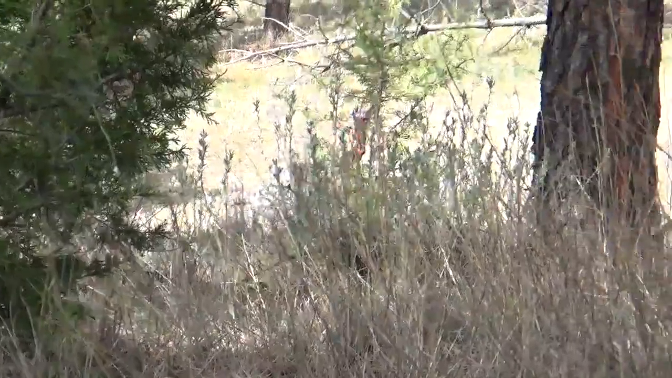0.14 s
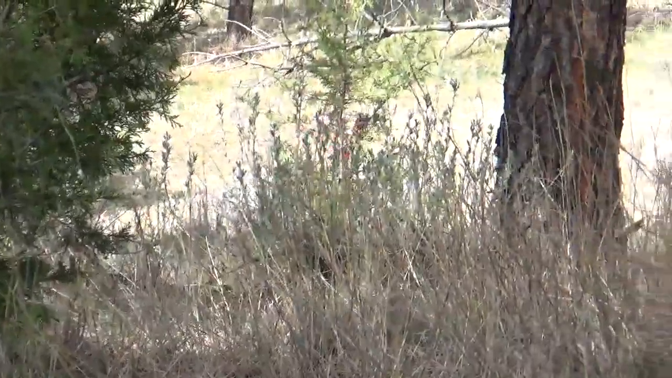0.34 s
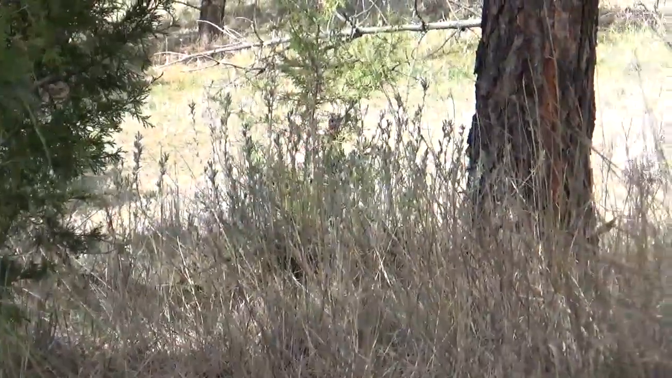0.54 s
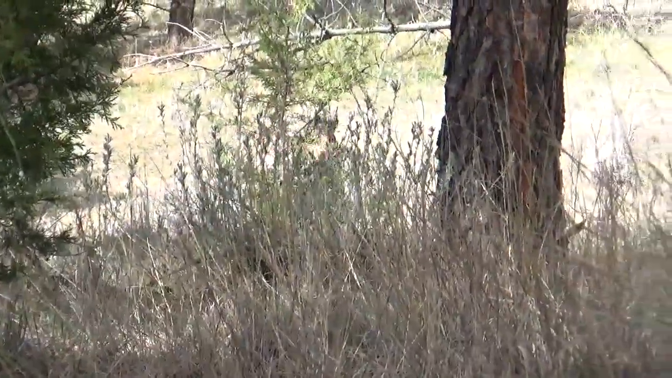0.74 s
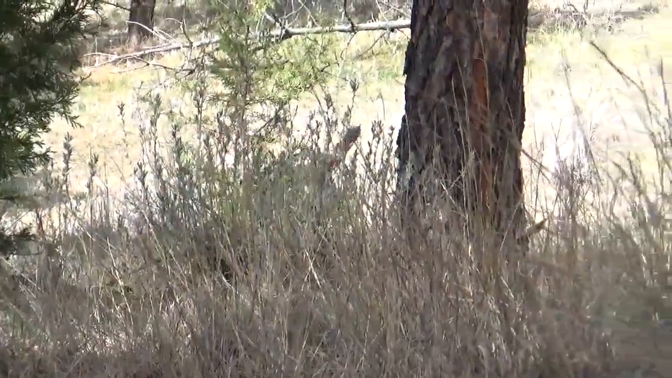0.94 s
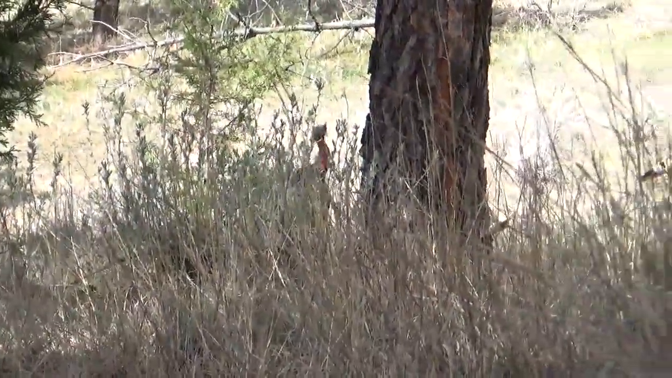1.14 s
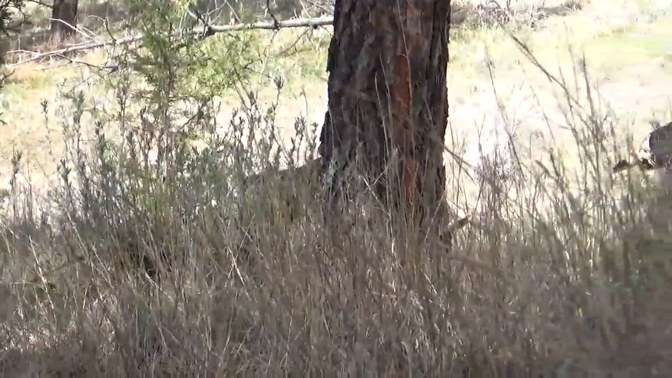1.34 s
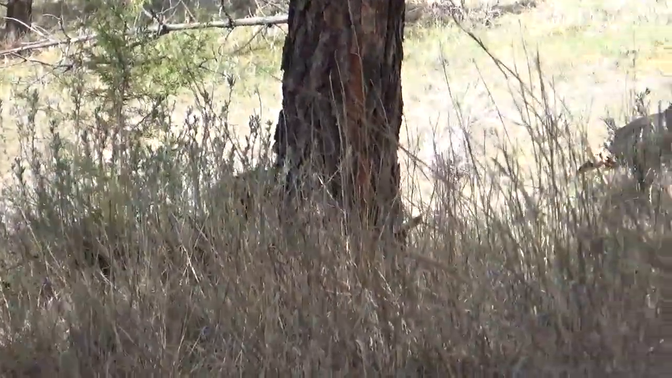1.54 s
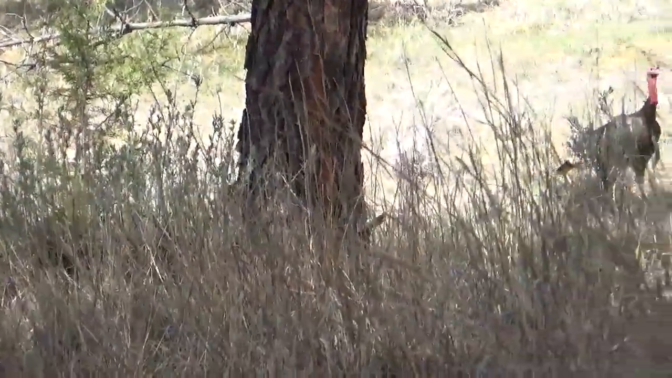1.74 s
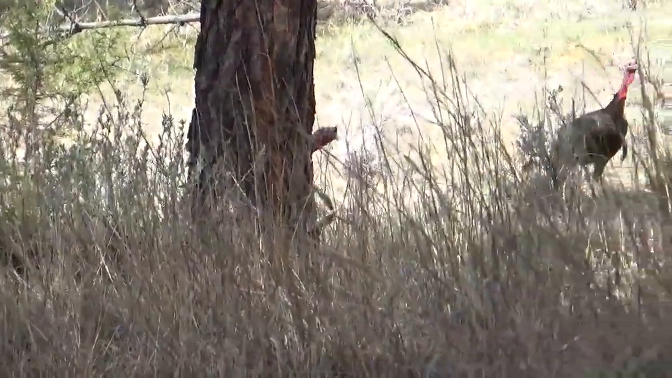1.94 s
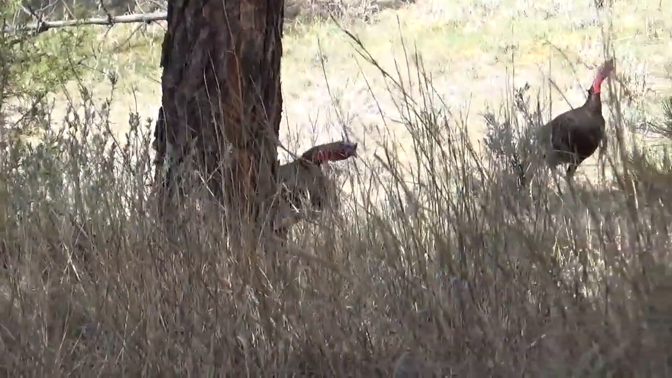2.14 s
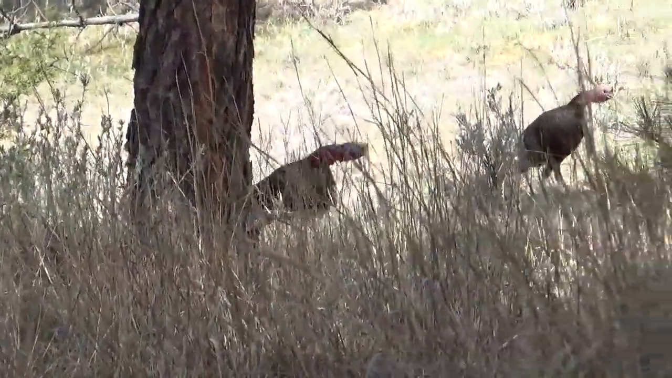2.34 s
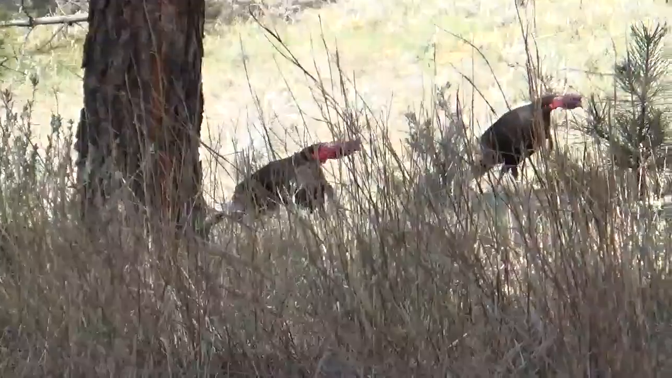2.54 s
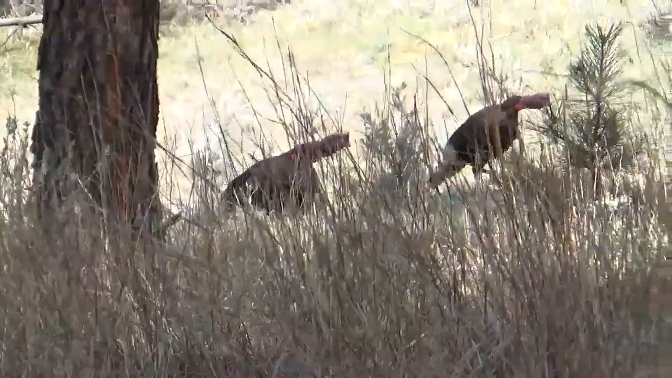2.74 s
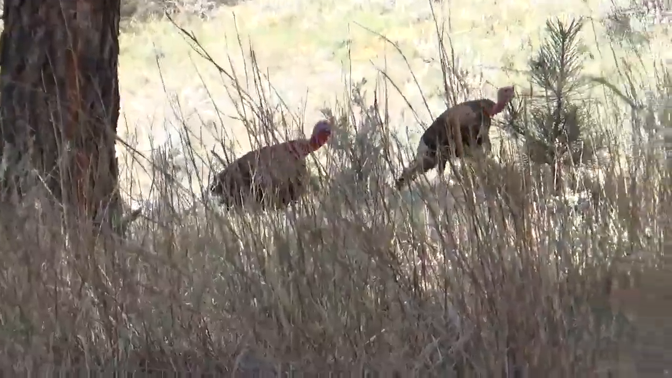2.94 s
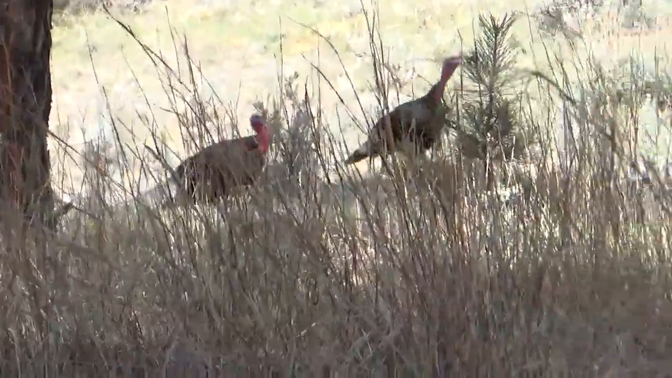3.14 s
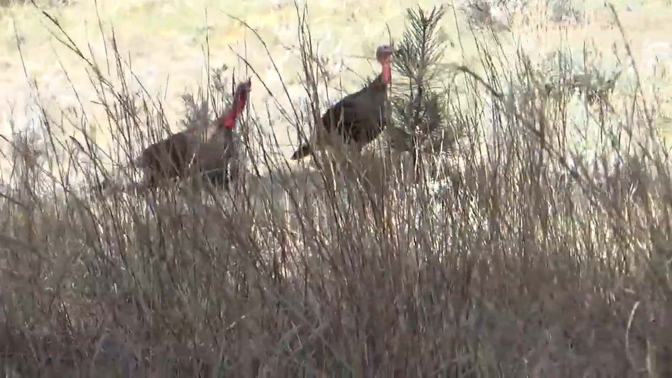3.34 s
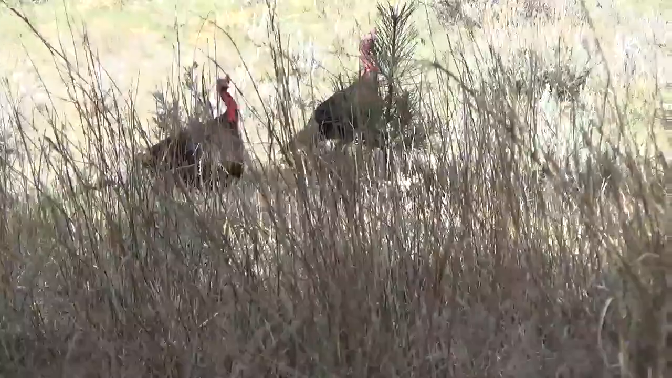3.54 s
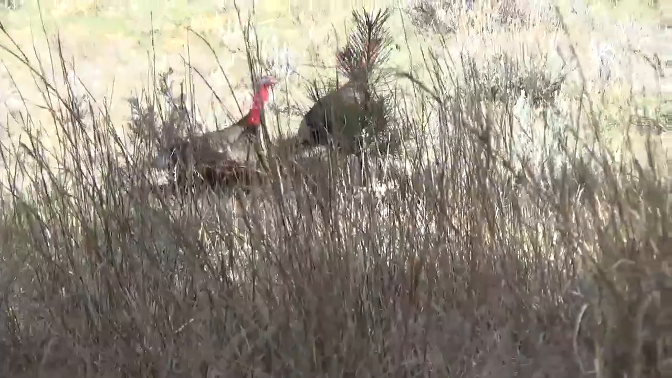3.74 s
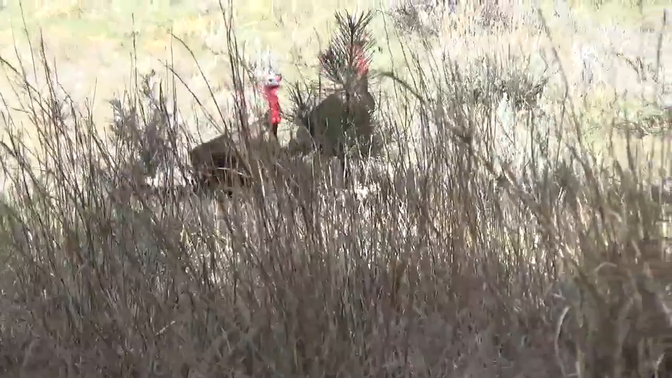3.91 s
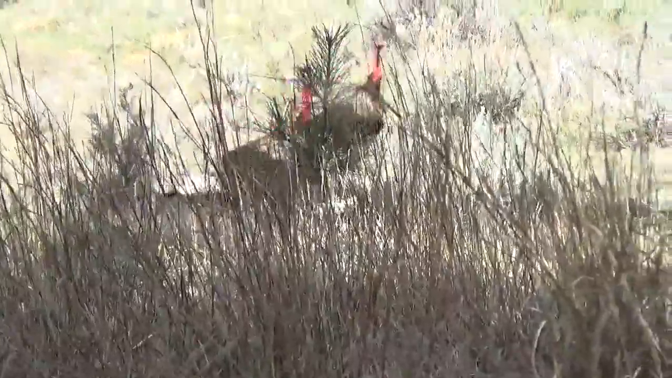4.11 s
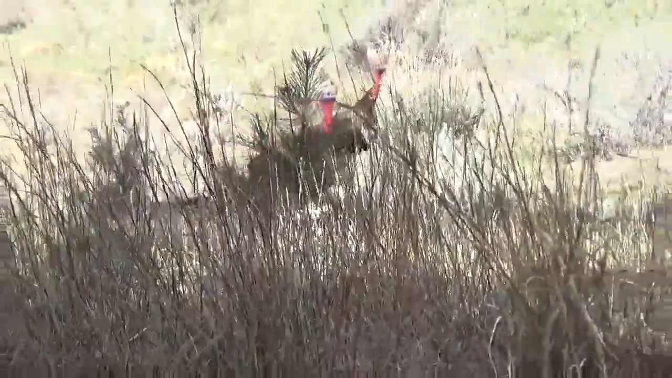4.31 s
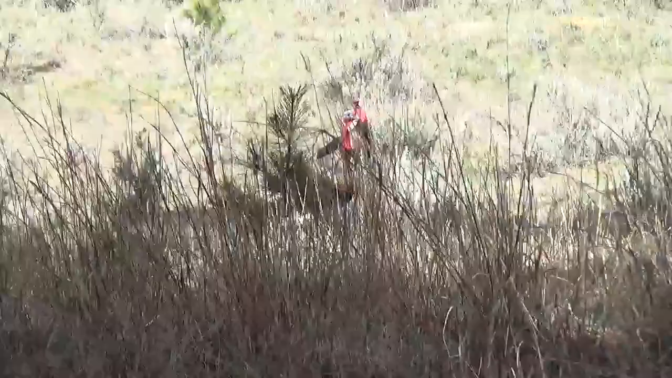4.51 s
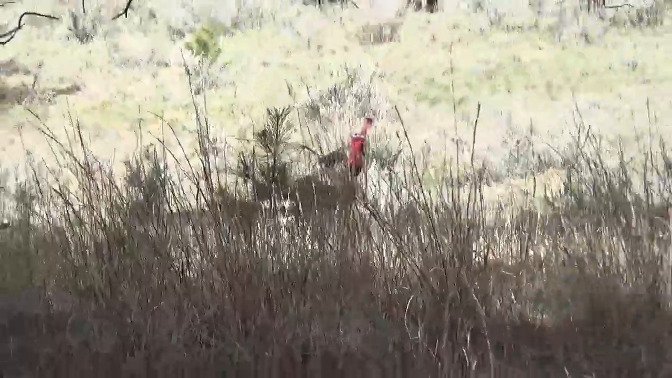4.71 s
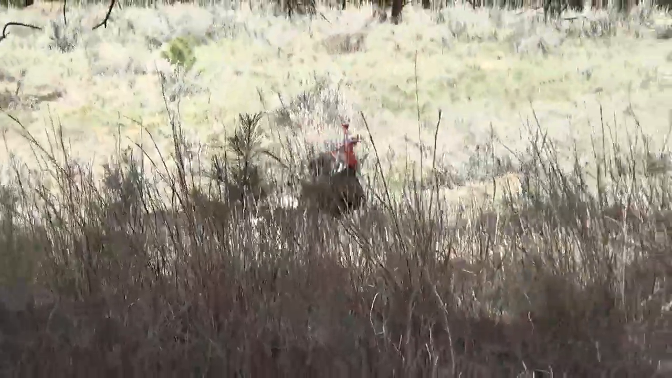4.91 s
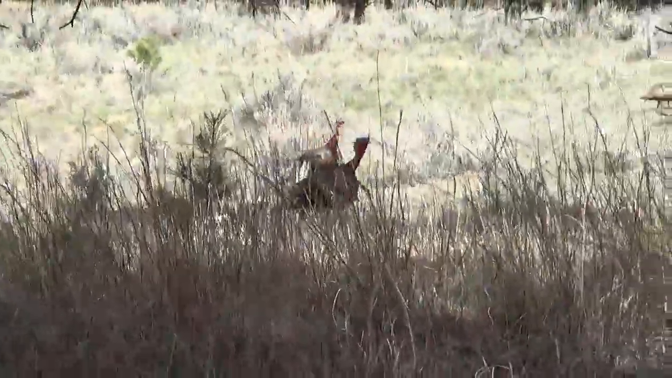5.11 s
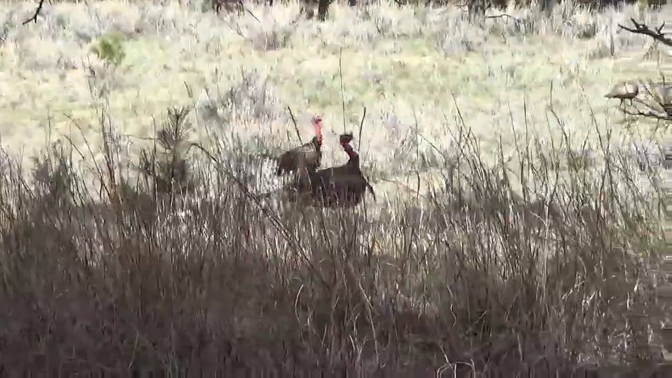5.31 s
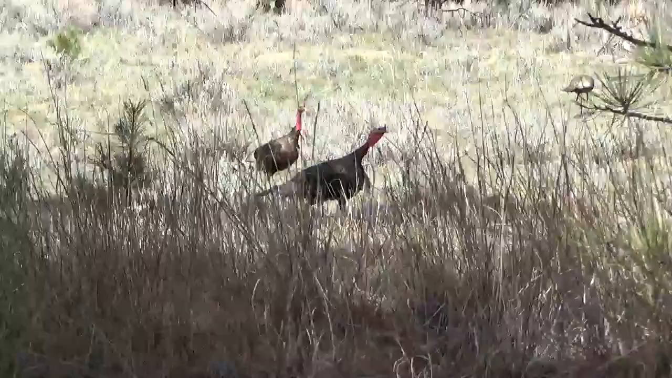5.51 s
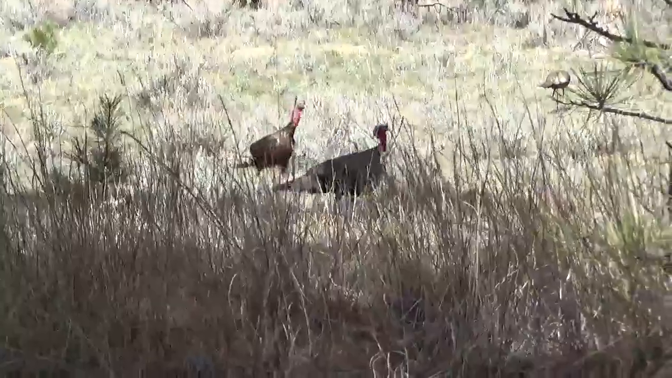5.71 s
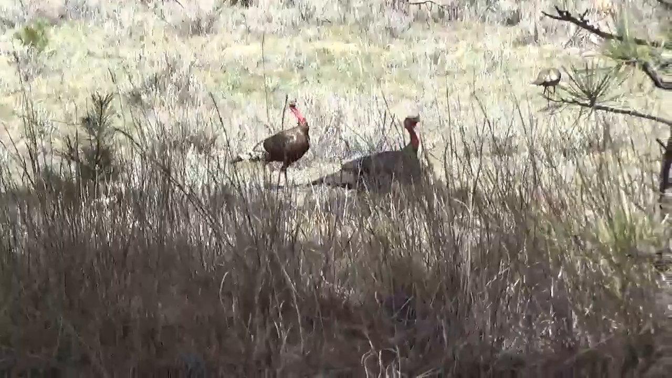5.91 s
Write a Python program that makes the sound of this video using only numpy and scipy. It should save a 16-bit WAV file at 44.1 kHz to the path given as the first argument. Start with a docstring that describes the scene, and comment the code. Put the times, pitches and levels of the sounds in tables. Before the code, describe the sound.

A hand-held camera microphone picks up quiet grassy woods: distant air hush, light rumble, a thin pulsing insect whistle. Dull palm thuds and a small knock come first, then two brief, weak turkey whines. One throaty gobble follows, a quick string of rough pulsing beats with small squeaks and a wavering tone, weakening at the end. Dry stalks then crackle softly and several more knocks and clicks hit the camera body.

```python
"""A far hush of air, a faint insect trill and stirring dry grass fill open woodland from the start.
Early on the hand-held camera begins to thud and click, and the grass to rustle in swells of tiny snaps.
From 1.5 s a wild turkey gives two thin whines, then one rattling gobble until about 3.1 s.
The two sides of its syrinx sound at once: one a harsh pulse train, the other a wavering tone.
Nearby brush and the trees scatter the call; air, insect, grass and camera go on after it."""
import sys
import numpy as np
from scipy import signal
from scipy.fft import rfft, irfft, next_fast_len
from scipy.io import wavfile
from scipy.ndimage import uniform_filter1d

SR = 44100
rng = np.random.default_rng(int(sys.argv[2]) if len(sys.argv) > 2 else 0)


def write(x):
    x = np.atleast_2d(x).T
    wavfile.write(sys.argv[1], SR, np.round(np.clip(x, -1, 1) * 32767).astype(np.int16))

N = 267246
TIME = np.arange(N) / SR

EDGE_HZ = 11200  # upper band edge of the recorder
CALL_END_S = 3.07  # where the last slack stretch of the gobble ends


def amp(db):
    """Amplitude factor of a level in dB."""
    return 10 ** (np.asarray(db) / 20)


def evened(x):
    """The signal scaled to an RMS of one."""
    return x / np.sqrt(np.mean(x ** 2) + 1e-20)


def read(points, hz):
    """A table of (Hz, value) joined on a log-frequency axis."""
    f, value = np.transpose(points)
    return np.interp(np.log(hz + 1), np.log(f + 1), value)


def add(mix, s, sound):
    """Lay a sound into the mix from the moment s in seconds."""
    part = mix[max(round(s * SR), 0):][:len(sound)]
    part += sound[:len(part)]


def wander(count, hz):
    """Slow chance of unit size that changes up to about hz times a second."""
    size = next_fast_len(count + 8192)  # room to spare, so that short pieces wander too
    f = np.fft.rfftfreq(size, 1 / SR)
    slowed = rfft(rng.standard_normal(size)) / (1 + (f / hz) ** 4)
    return evened(irfft(slowed, size))[:count]


def tinted(spectrum):
    """Steady noise of unit RMS with the given spectrum."""
    gain = amp(read(spectrum, np.fft.rfftfreq(N, 1 / SR)))
    return evened(irfft(rfft(rng.standard_normal(N)) * gain, N))


def air(hush_db=-49.5, rumble_db=-62, gust_db=3, apart_db=-12):
    """The steady far hush of the woods, with a lumpy rumble of moving air at the microphone."""
    # spectrum of the hush: (frequency [Hz], relative density [dB per Hz])
    hush_spectrum = [(12, -41), (20, -19.5), (145, -4), (295, -4.5), (475, 0.5), (587, 0.5), (2380, -18.5),
                     (2860, -21), (3350, -24), (10200, -26.5), (11000, -29), (14300, -116), (22000, -120)]
    # likeness of the two channels: (frequency [Hz], likeness [0-1])
    likeness = [(60, 1), (170, 0.92), (490, 0.94), (1400, 0.58), (3990, 0.18), (11400, 0.82)]
    # course of the rumble about its mean: (time [s], level [dB])
    breeze = [(0, 1), (.8, 2), (1.6, -12), (2.5, 8.5), (3.0, -6.5), (3.65, 1), (4.15, 8), (4.6, -8),
              (5.2, -2), (5.6, -7), (6.06, 2)]
    rumble_spectrum = [(10, -3.0), (30, 1.5), (90, -4), (250, -33), (1000, -73)]  # (Hz, dB per Hz)
    middle, other = tinted(hush_spectrum), tinted(hush_spectrum)
    same = np.clip(read(likeness, np.fft.rfftfreq(N, 1 / SR)), 0, 1)
    side = irfft(rfft(other) * np.sqrt((1 - same) / (1 + same)), N)
    hush = amp(hush_db) * np.array([middle + side, middle - side])
    gusts = amp(rumble_db + np.interp(TIME, *np.transpose(breeze)) + gust_db * wander(N, 6.4))
    shared, left, right = (tinted(rumble_spectrum) for _ in range(3))
    return hush + gusts * (shared + amp(apart_db) * np.array([left, right]))


def grass(stir_db=-68, stir_swing_db=3.5, stir_hz=9.2, snap_db=3.2):
    """Dry stalks stir faintly throughout and brush past each other in soft swells of tiny snaps."""
    # clearest brushes: (middle [s], length [s], level [dB])
    rustles = [(0.948, 0.029, -57.5), (1.5, 0.077, -62.5), (3.202, 0.16, -56.5), (4.106, .05, -59.5),
               (4.283, 0.07, -63), (4.8, 0.24, -61), (5.077, 0.18, -63.5), (5.321, 0.045, -58),
               (5.43, 0.15, -61.5)]
    # spectrum of the stalks: (frequency [Hz], relative density [dB per Hz])
    stalks = [(300, -26), (1500, -5), (3600, 1.5), (6000, -7.5), (11000, -8.5)]
    swell = sum(amp(db) * np.exp(-(2 * (TIME - s) / length) ** 2) for s, length, db in rustles)
    stir = amp(stir_db + stir_swing_db * wander(N, stir_hz))
    snaps = evened(tinted(stalks) * amp(snap_db * wander(N, 210)))
    return (swell + stir) * snaps


def insect(chirps_per_s=30.2, waver=0.0119):
    """A distant trill: one soft whistle for each wing stroke."""
    # course of the trill: (time [s], whistle pitch [Hz], level [dB])
    trill_course = [(0, 2860, -69), (.7, 2890, -68.5), (1.8, 2890, -68.5), (3.3, 2870, -68.5),
                    (4.1, 2860, -68.5), (4.3, 2840, -94), (5.3, 2810, -75), (5.6, 2800, -70),
                    (6.06, 2800, -74)]
    s, hz, db = np.transpose(trill_course)
    strokes = np.cumsum(chirps_per_s * (1 + 0.0034 * wander(N, 3.5))) / SR
    turns = np.cumsum(np.interp(TIME, s, hz) * (1 + waver * wander(N, 150))) / SR
    # a little of the whistle stays between the strokes
    trill = np.sin(2 * np.pi * turns) * (.04 + np.sin(np.pi * strokes) ** 6)
    return amp(np.interp(TIME, s, db) + wander(N, 27)) * evened(trill)


def knock(db, hard_hz, octaves=0.89, rise_cycles=1.83, tick_decay_s=0.0028,
          tick_db=6, tick_growth=1.76, tick_full_hz=900):
    """A contact feeds the case modes near its own hardness; low modes take longer to build up."""
    # modes of the camera body: (nominal frequency [Hz], level [dB], t60 [s])
    case = [(194, 3.5, 0.033), (332, 5, 0.021), (938, 2.5, 0.034), (1750, 0, 0.021), (2120, -4, 0.035),
            (3960, -3, 0.017), (7260, -2, 0.014)]
    t = TIME[:SR // 10]
    ring = 0
    for hz, mode_db, t60 in case:
        tone = amp(mode_db - 60 * t / t60) * np.sin(2 * np.pi * hz * rng.uniform(0.93, 1.01) * t)
        rise = 1 - np.exp(-(t * max(hz, 700) / rise_cycles) ** 2)
        ring = ring + tone * rise / (1 + (np.log2(hz / hard_hz) / octaves) ** 2)
    # the tick grows faster with level than the ring; soft contacts tick less
    tick = rng.standard_normal(len(t)) * np.exp(-t / tick_decay_s)
    tick_gain = amp(tick_db + tick_growth * db) * min(hard_hz / tick_full_hz, 1) ** 2
    return amp(db) * ring + tick_gain * tick


def camera(thud_cycles=2.6):
    """Fingers knock the case into short ringing; the palm gives dull thuds."""
    # knocks on the case: (time [s], drive level [dB], hardness as the frequency excited most [Hz])
    knocks = [(0.85, -24.5, 280), (.852, -39.5, 1000), (2.526, -22.5, 606), (3.961, -36, 1280),
              (3.98, -40, 1200), (4.068, -34, 280), (4.232, -32, 378), (4.977, -32.5, 1650),
              (5.003, -22.5, 1010), (5.284, -36.5, 1590)]
    # thuds of the hand: (middle [s], level [dB], pitch [Hz])
    thuds = [(.224, -39.5, 55), (.325, -42.5, 79.6), (0.637, -38.5, 60.4), (.8, -43, 55),
             (1.272, -38.5, 75), (2.48, -40.5, 55), (2.534, -39, 98), (4.103, -41.5, 72), (4.14, -45, 85),
             (4.2, -30, 80.5), (5.87, -45, 42), (6.009, -44, 47.7)]
    out = np.zeros(N)
    for s, db, hard_hz in knocks:
        add(out, s, knock(db, hard_hz))
    for s, db, hz in thuds:
        reach = thud_cycles / hz  # seconds to either side of the middle
        u = np.arange(-reach, reach, 1 / SR)
        swell = np.exp(-(4.1 * u / reach) ** 2)
        add(out, s - reach, amp(db) * np.sin(2 * np.pi * (hz * u + rng.random())) * swell)
    return out


def whine(s, length, first_hz, middle_hz, last_hz, db, jitter=0.014, flutter_db=3, hoarse=0.67):
    """A thin, hoarse note whose few partials slide together."""
    # levels of harmonics 1-6: level [dB]
    partials_db = [-7.5, -2.5, -2, -14, -11, -20]
    count = round(length * SR)
    curve = np.polyfit([0, .5, 1], [first_hz, middle_hz, last_hz], 2)
    bend = np.polyval(curve, np.linspace(0, 1, count))
    phase = 2 * np.pi * np.cumsum(bend * (1 + jitter * wander(count, 120))) / SR
    note = sum(amp(partial_db + flutter_db * wander(count, 80))
               * np.sin(k * phase + hoarse * wander(count, 330))
               for k, partial_db in enumerate(partials_db, 1))
    return s, amp(db) * evened(note) * signal.windows.tukey(count, .4)


def throat(x, swell_db, beak_db, top_hz, low_hz=850, high_hz=2800, cut_hz=430, shift=0.029, size=2048):
    """Causal ringing of the airway; a swollen throat lifts the bass and an open beak the treble."""
    # windpipe and mouth resonances: (nominal frequency [Hz], nominal width [Hz], level [dB])
    resonances = [(567, 146, 3), (1150, 2300, -7), (1837, 130, 0), (2130, 620, -7), (3260, 400, -6),
                  (3420, 360, -21), (4150, 920, -11.5), (4920, 620, -8.5), (6130, 600, -15),
                  (8100, 2400, -30.5), (9960, 1000, -20.5)]
    f = abs(np.fft.fftfreq(size, 1 / SR)) + 1
    stretch = 1 + shift * rng.standard_normal(len(resonances))  # the shaking neck retunes each one
    power = sum(amp(db) ** 2 / (1 + ((f - hz * k) / (0.69 * width)) ** 2) ** 2
                for (hz, width, db), k in zip(resonances, stretch))
    shelves_db = swell_db / (1 + (f / low_hz) ** 6) + beak_db / (1 + (high_hz / f) ** 10)
    edges = np.hypot(1, (cut_hz / f) ** 2) * np.hypot(1, (f / top_hz) ** 3)
    log_gain = np.log(np.sqrt(power) * amp(shelves_db) / edges + 1e-5)
    ring = np.fft.ifft(np.exp(np.conj(signal.hilbert(log_gain)))).real  # minimum phase
    return signal.fftconvolve(x, ring)[:len(x)]


def syllable(s, length, db, first_hz, last_hz, rough, swell_db, beak_db, tone_hz, tone_db, arch_db,
             fade=.007, arch=.035, jitter=.025, smear=1.33, flutter_db=8, rattle_db=2,
             tone_jitter=0.042, tone_flutter_db=3):
    """One beat of the gobble: both sides of the syrinx, shaken more as the voice gets rough."""
    t = np.arange(-fade, length + fade, 1 / SR)
    count, rough = len(t), np.clip(rough, 0, 1)
    from_edge = np.minimum(t + fade, length + fade - t)
    gate = np.sin(np.pi / 2 * np.clip(from_edge / (2 * fade), 0, 1))
    push = np.sin(np.pi * np.clip(t / length, 0, 1)) - 2 / np.pi  # highest in mid-beat

    # first side: a pulse train, whose partials stagger in phase and strength when rough
    glide = np.interp(t, [0, length], [first_hz, last_hz])
    hz = glide * (1 + rough * (arch * push + jitter * wander(count, 110)))
    turns = np.cumsum(hz) / SR
    pulses = sum(amp(flutter_db * rough * wander(count, 67))
                 * np.cos(2 * np.pi * k * turns + smear * rough * wander(count, 93))
                 for k in np.arange(1, int(EDGE_HZ / first_hz) + 2))
    puffs = (0.3 + np.exp(-(turns % 1) / 0.17)) * rng.standard_normal(count)  # air escapes once a cycle
    drive = (1 - rough) * evened(pulses) + 1.27 * rough * evened(puffs)
    drive = drive * amp(rattle_db * rough * wander(count, 170))
    top_hz = np.interp(db, [-50, -41, -28], [3300, 6000, 11000])  # a harder push is brighter
    voice = evened(throat(drive, swell_db, beak_db, top_hz))

    # second side: a wavering tone
    tone_turns = np.cumsum(tone_hz * (1 + tone_jitter * rough * wander(count, 140))) / SR
    tone_swing = (1 + rough * wander(count, 216)) * amp(tone_flutter_db * wander(count, 89))
    tone = evened(tone_swing * np.sin(2 * np.pi * tone_turns))
    return s - fade, gate * amp(arch_db * push) * (amp(db) * voice + amp(tone_db) * tone)


def course(s):
    """Level between pushes, throat, beak and second tone at a moment of the call."""
    # how the call runs: (time [s], level between pushes [dB], swell of the throat [dB],
    # opening of the beak [dB], second tone [Hz])
    call_course = [(1.931, -45.5, -12, -8, 1063), (2.02, -40, -4, 1, 1309), (2.076, -40, -11, -5, 846),
                   (2.11, -44, 8, -0.5, 1200), (2.19, -35.5, -17.5, -4, 1160),
                   (2.29, -36, -2.5, -4.5, 1020), (2.43, -35.5, -4.5, -0.5, 1071),
                   (2.6, -39, -1, -0.5, 1007), (2.8, -44.5, 1, 0, 902), (3.0, -45.5, 8, 5, 872),
                   (3.06, -54, 3, 9, 846)]
    times, *columns = np.transpose(call_course)
    return [np.interp(s, times, column) for column in columns]


def beat(s, length, db, hz, glide_hz, rough, tone_db, shut_db, arch_db, tone_scatter=0.0346):
    """A syllable coloured by how far the call has run."""
    _, swell_db, beak_db, tone_hz = course(s + length / 2)
    tone_hz *= 1 + tone_scatter * rng.standard_normal()  # lands a little off its course
    return syllable(s, length, db, hz - glide_hz / 2, hz + glide_hz / 2, rough,
                    swell_db, beak_db + shut_db, tone_hz, tone_db, arch_db)


def squeak(s, length, first_hz, last_hz, db, octave_db=-13, jitter=0.0049):
    """A membrane briefly locks into a gliding whistle."""
    count = round(length * SR)
    hz = np.linspace(first_hz, last_hz, count) * (1 + jitter * wander(count, 150))
    phase = 2 * np.pi * np.cumsum(hz) / SR
    octave = amp(octave_db) * (2000 / first_hz) ** 3 * np.sin(2 * phase)  # weaker in high squeaks
    return s, amp(db) * np.sqrt(2 * np.hanning(count)) * (np.sin(phase) + octave)


def gobble(push_arch_db=1.5, slack_arch_db=2, shortest_s=.006,
           slack_pitch=0.95, slack_rough=0.55, slack_beak_db=-5, slack_tone_db=-3.5,
           squeak_chance=.55, squeak_below_db=-10.5, squeak_s=0.021,
           squeak_low_hz=2144, squeak_high_hz=3950, squeak_glide=0.065):
    """Each push gives a loud beat, now and then a squeak; the voice runs on slackly until the next."""
    # pushes of the call: (start [s], length [s], level [dB], middle pitch [Hz], glide [Hz],
    # roughness [0-1], second tone level [dB])
    pushes = [(1.922, 0.03, -37, 528, 12.5, 0.38, -42), (1.987, .032, -34, 649, 57.5, .8, -31),
              (2.019, 0.04, -32.5, 702, -22.5, 0.52, -37.5), (2.063, 0.027, -40.5, 653, 50, 0.57, -36.5),
              (2.085, 0.032, -36.5, 656, -39, 0.46, -46), (2.138, .028, -36.5, 610, 27, 0.74, -39.5),
              (2.182, 0.03, -25, 581.4, 7.5, 0.25, -48), (2.21, 0.066, -29, 596.6, 23, 0.48, -37.5),
              (2.32, 0.046, -33.5, 591, -44.5, 0.52, -34.5), (2.377, 0.038, -33.5, 584, 43, 0.45, -39.5),
              (2.435, 0.028, -30, 642, 61.5, .34, -50), (2.462, 0.027, -30, 627.7, -28.5, 0.48, -35.5),
              (2.504, 0.018, -36.5, 542, -32, .6, -32.5), (2.52, 0.026, -32, 617.5, -33.5, 0.4, -36),
              (2.575, 0.033, -34, 533, -6, 0.54, -34.5), (2.626, 0.021, -30.5, 612, 41, 0.32, -40),
              (2.652, .021, -30, 597, -21, 0.44, -43), (2.712, 0.025, -31.5, 560.7, -41, 0.45, -41),
              (2.741, 0.028, -35.5, 547, 1, 0.35, -39.5), (2.77, 0.027, -44.5, 585, 15, 0.56, -39.5),
              (2.819, 0.03, -38, 501.4, -0.5, 0.45, -38), (2.844, 0.019, -36, 600, -2, 0.5, -42),
              (2.911, 0.032, -36.5, 522.3, -45.5, .44, -43.5), (2.988, 0.018, -42.5, 447, 7, 0.3, -39),
              (3.005, .03, -45.5, 505, 16, 0.68, -45.5)]
    out = np.zeros(N)
    call_end = (CALL_END_S,) + pushes[-1][1:]
    for row, following in zip(pushes, pushes[1:] + [call_end]):
        add(out, *beat(*row, 0, push_arch_db))
        s, length, _, hz = row[:4]
        end, pause, next_hz = s + length, following[0] - s - length, following[3]
        if pause > shortest_s:
            # pitch sags, the beak closes a little and the second tone sinks under the voice
            slack_db = course(end + pause / 2)[0]
            add(out, *beat(end, pause, slack_db, slack_pitch * (hz + next_hz) / 2, (next_hz - hz) / 2,
                           slack_rough, slack_db + slack_tone_db, slack_beak_db, slack_arch_db))
    # any push may squeak, under its own level
    for (s, length, db, *_), (luck, when, pitch, bend) in zip(pushes, rng.random((len(pushes), 4))):
        if luck < squeak_chance:
            hz = squeak_low_hz + pitch * (squeak_high_hz - squeak_low_hz)
            last_hz = hz * (1 + squeak_glide * (2 * bend - 1))
            add(out, *squeak(s + when * length - squeak_s / 2, squeak_s, hz, last_hz, db + squeak_below_db))
    return out


def crackle(effort, fizz_db=-41, flicker_db=2.5):
    """A high crackle near 10 kHz that follows the effort of the call."""
    # course of the crackle relative to the effort: (time [s], level [dB])
    crackle_course = [(1.96, -22), (2.0, -3), (2.04, 0.5), (2.1, -8), (2.15, 7), (2.19, -24), (2.23, 7),
                      (2.28, -8), (2.5, -15), (2.9, -8.5)]
    hiss = tinted([(5000, -42), (9300, -11.5), (10300, -2.5), (11000, -0.5), (12500, -57)])
    fizz = evened(hiss * amp(flicker_db * wander(N, 320)))
    return amp(fizz_db + np.interp(TIME, *np.transpose(crackle_course))) * effort * fizz


def purr(effort, end_db=-48, growth_db_per_s=5.5):
    """The breast purrs low with the root of the effort, and more as the call runs down."""
    hum = tinted([(80, -31), (150, -7.5), (185, 0.0), (240, -14.0), (400, -15), (900, -62)])
    growth_db = growth_db_per_s * np.minimum(TIME - CALL_END_S, 0)
    return amp(end_db + growth_db) * np.sqrt(effort) * hum


def brush(call, brush_db=-13):
    """Nearby stalks answer from 3 ms on within about 30 ms, differently at each ear."""
    lag = TIME[:1400]
    scatter = rng.standard_normal(len(lag)) * np.exp(-lag / .009) * (lag > .003)
    side = amp(brush_db) * signal.oaconvolve(call, scatter / np.linalg.norm(scatter))[:N]
    return np.array([side, -side])


def woods(x, first_s=.012, low_t60=0.43, high_t60=0.18, order=40):
    """Trunks and ground scatter sound back as sparse echoes, different at each ear."""
    # one sample in `order`, on average, holds an echo
    taps = rng.standard_normal((2, SR)) * (rng.random((2, SR)) < 1 / order) * (TIME[:SR] > first_s)
    hz, t, z = signal.stft(taps, SR, nperseg=256)
    t60 = read([(600, low_t60), (8000, high_t60)], hz)[:, None]  # treble dies sooner
    tail = signal.istft(z * amp(-60 * t / t60), SR, nperseg=256)[1]
    return signal.fftconvolve(x[None], tail / np.linalg.norm(tail[0]), axes=1)[:, :N]


def turkey(woods_db=-16):
    """The call arrives directly, scattered by the nearby brush, and from the trees."""
    # notes before the gobble: (start [s], length [s], first, middle, last pitch [Hz], level [dB])
    whines = [(1.553, 0.0744, 580, 610, 710, -48), (1.826, .084, 735, 650, 837, -46)]
    # loudest squeaks: (start [s], length [s], first pitch [Hz], last pitch [Hz], level [dB])
    squeaks = [(1.934, 0.03, 2144, 1940, -41.5), (2.024, 0.031, 3523, 3510, -36.5),
               (2.18, 0.013, 1447, 1730, -34.5), (2.186, 0.017, 3450, 3580, -31),
               (2.619, 0.026, 2130, 2360, -36), (2.633, 0.028, 1748, 1892, -29),
               (2.848, 0.019, 1753, 1710, -36), (2.984, 0.016, 3510, 3520, -42)]
    call = gobble()
    for row in whines:
        add(call, *whine(*row))
    for row in squeaks:
        add(call, *squeak(*row))
    effort = np.sqrt(abs(uniform_filter1d(call ** 2, size=300)))
    effort /= effort.max()
    call += crackle(effort) + purr(effort)
    return call + brush(call) + amp(woods_db) * woods(call)


def scene():
    """Air, grass and insect around the microphone, the handled camera, and the turkey."""
    return air() + grass() + insect() + camera() + turkey()


def record(dry):
    """The recorder's steep band limit."""
    band = signal.firwin(511, EDGE_HZ, window=("kaiser", 8), fs=SR)
    return signal.oaconvolve(dry, band[None], "same", axes=1)


dry = scene()
out = record(dry)
write(out)
```